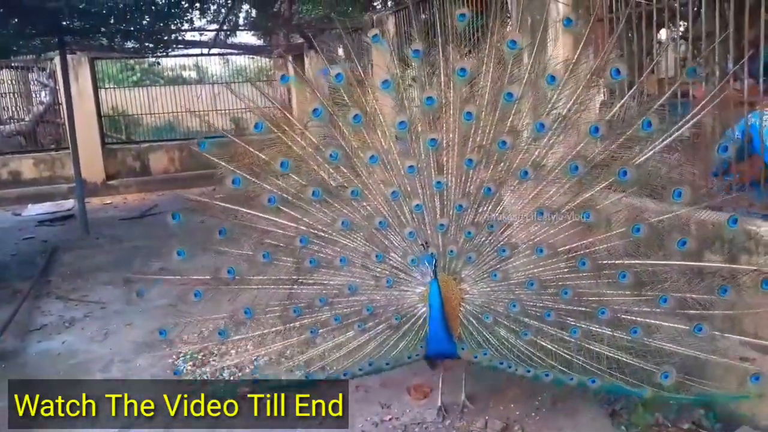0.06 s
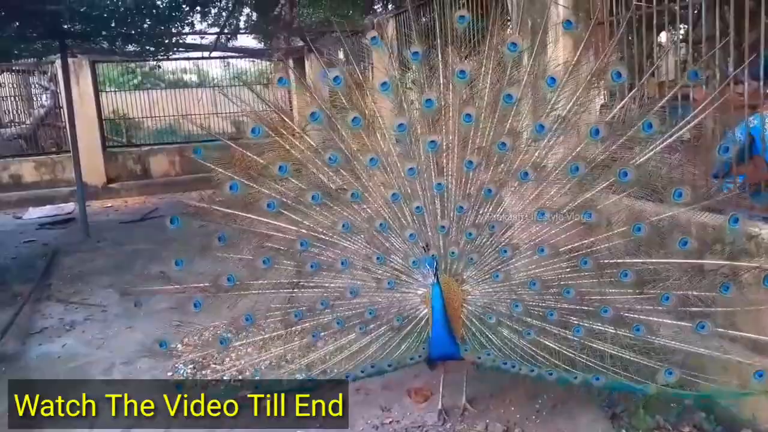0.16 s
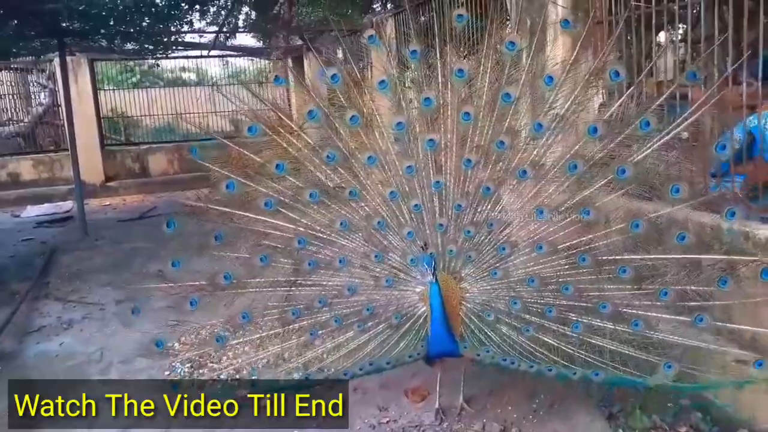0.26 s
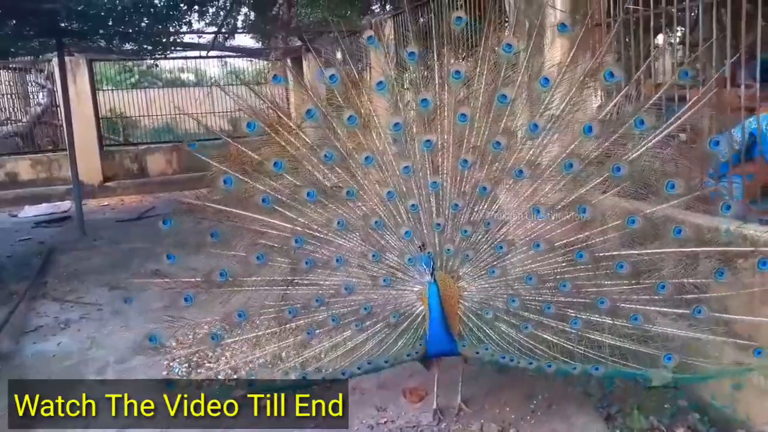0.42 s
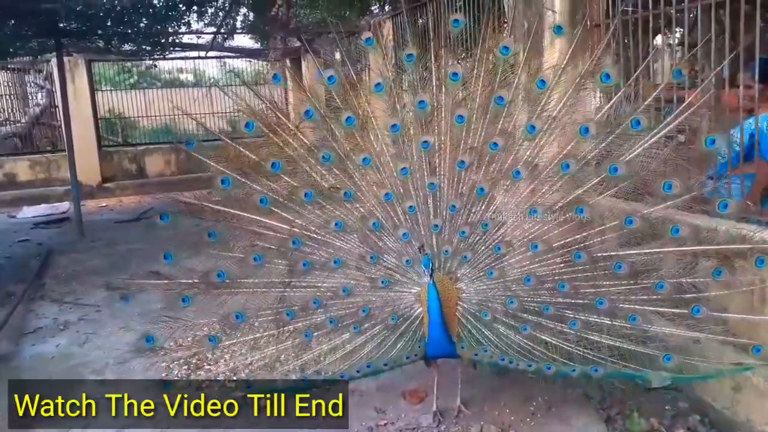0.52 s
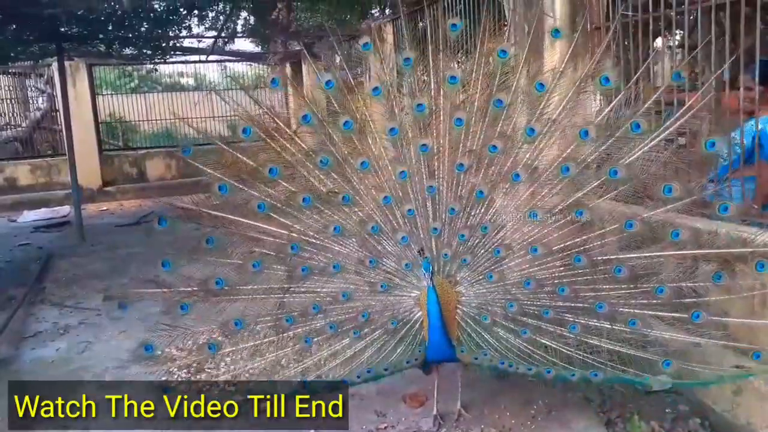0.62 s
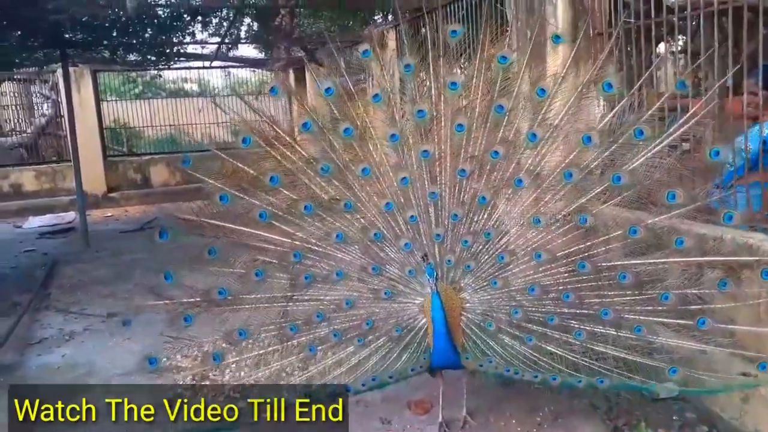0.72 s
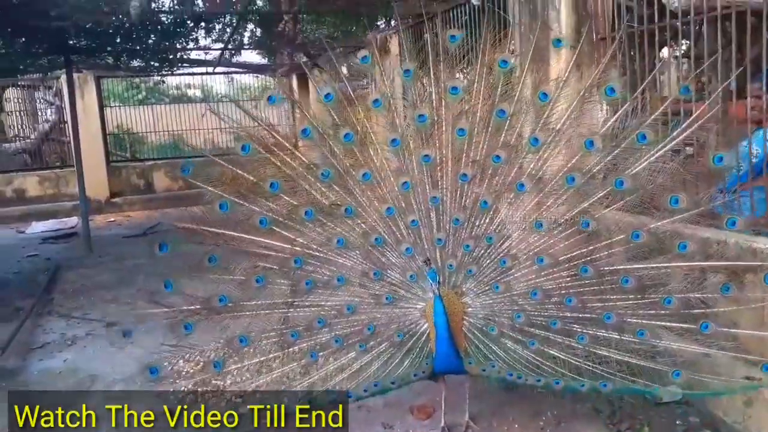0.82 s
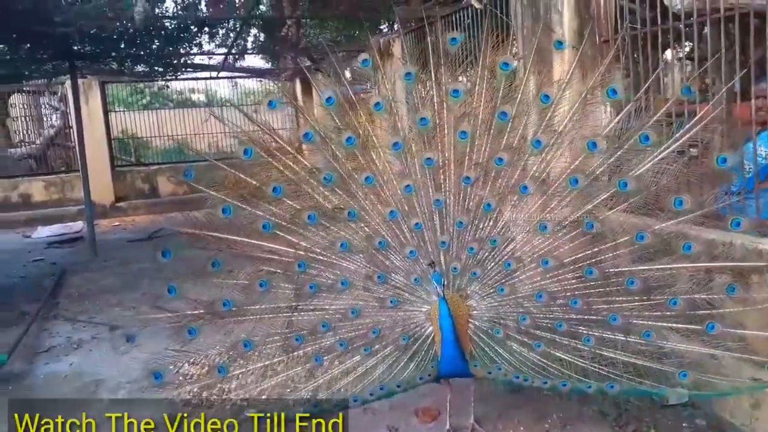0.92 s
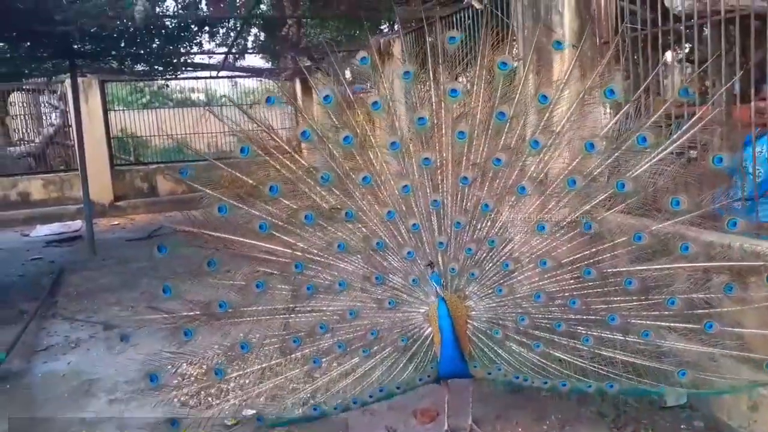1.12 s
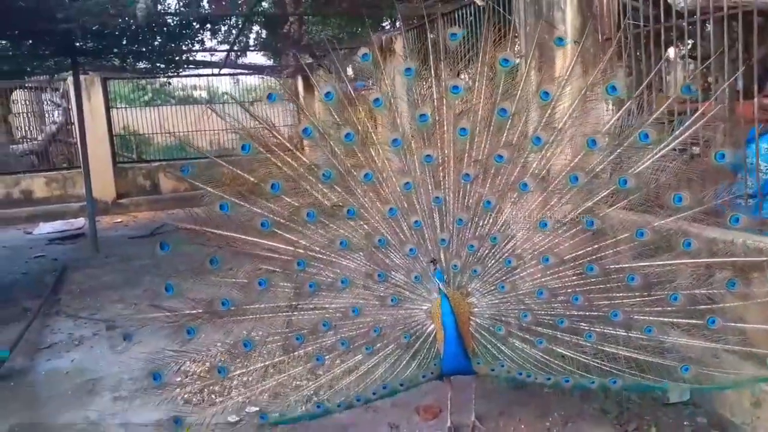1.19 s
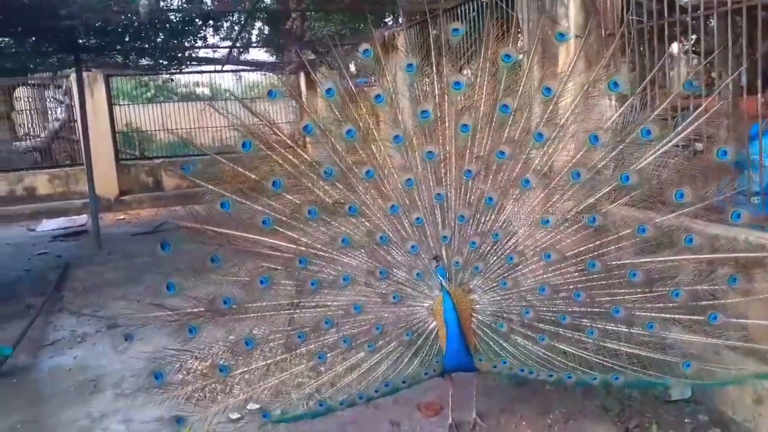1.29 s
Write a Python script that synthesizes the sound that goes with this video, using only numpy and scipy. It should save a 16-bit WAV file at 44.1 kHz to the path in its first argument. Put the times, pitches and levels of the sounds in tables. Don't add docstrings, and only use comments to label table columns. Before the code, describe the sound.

A single loud peacock scream starts almost at once, rises quickly, peaks, then sinks and stops. Short echoes from a walled yard follow, over faint engine throb and distant murmur, heard on an overloaded phone microphone.

```python
import sys
import numpy as np
from scipy import signal
from scipy.fft import rfft, irfft, next_fast_len
from scipy.io import wavfile
from scipy.ndimage import uniform_filter1d

SR = 44100
rng = np.random.default_rng(int(sys.argv[2]) if len(sys.argv) > 2 else 0)


def wav_out(sig):
    wavfile.write(sys.argv[1], SR, np.round(np.clip(np.atleast_2d(sig).T, -1, 1) * 32767).astype(np.int16))


def invert_db(level):
    return 10 ** (np.asarray(level, dtype=float) / 20)


N = 59535


def level(x, db):
    return x * invert_db(db) / np.sqrt(np.mean(x ** 2))


def ring(f, hz, width):
    return 1j * f * width / (hz ** 2 - f ** 2 + 1j * f * width)


def shape(x, response):
    n = next_fast_len(N + SR // 4)
    f = np.arange(n // 2 + 1) * SR / n
    return irfft(rfft(x, n) * response(f), n)[..., :N]


def walk(rate):
    hold = int(SR / rate)
    steps = np.repeat(rng.standard_normal(N // hold + 1), hold)
    slewed = uniform_filter1d(uniform_filter1d(steps, hold), hold)
    return 1.3 * slewed[:N]


def wavering_tone(hz, drift):
    return np.sin(2 * np.pi * np.cumsum(hz * (1 + drift * walk(30))) / SR)


def peacock(t):
    # t/s, pitch f/Hz, effort level/dB, brightness/(dB per octave), hiss level/dB
    call_arch = [
        (0.187, 542.5, -9, -6, 3.5),
        (.22, 577, -3.5, -3, 9.5),
        (0.279, 630.8, -3, -0.5, 7),
        (.36, 656.3, -4, 2.5, 3.5),
        (0.469, 668.5, 3, -2.5, 8),
        (0.602, 656.2, -3, 1.5, -7),
        (0.669, 628, -5, 0.5, -1.5),
        (.78, 549.2, -7, -2, -13.5),
        (.822, 479.8, -14.5, -3.5, -1.5),
    ]
    attack_s, release_s, call_db = 0.00297, 0.0067, -6.5
    wobble, jitter_rad, shimmer_db = 0.00022, 0.003, 0.61
    breath_db, hiss_db, hiss_hz, hiss_width_hz = -30, -18.5, 11300, 8000
    s, hz, effort_db, tilt, rasp_db = np.array(call_arch).T

    def smooth(values, size):
        return uniform_filter1d(np.interp(t, s, values), size)

    rasp = invert_db(smooth(rasp_db, size=400))
    pitch = smooth(hz, size=1800) * (1 + wobble * walk(60))
    phase = 2 * np.pi * np.cumsum(pitch) / SR + jitter_rad * rasp * walk(500)
    bright = smooth(tilt, size=400)
    voice = 0
    for k in range(1, 26):
        harmonic_db = bright * np.log2(k) + shimmer_db * walk(40)
        voice = voice + invert_db(harmonic_db) * np.cos(k * phase)

    air = rng.standard_normal((3, N)) * (1 + np.cos(phase)) * rasp
    opening = np.clip((t - s[0] + attack_s) / attack_s, 0, 1)
    closing = np.clip((s[-1] + release_s - t) / release_s, 0, 1)
    effort = invert_db(smooth(effort_db, size=400)) * opening * closing
    hiss = invert_db(hiss_db) * shape(air[1:] * effort, lambda f: ring(f, hiss_hz, hiss_width_hz) ** 2)
    piped = shape((voice + invert_db(breath_db) * air[0]) * effort, windpipe)
    return invert_db(call_db) * (piped + hiss), effort


def windpipe(f):
    # f/Hz, width/Hz, left level/dB, right level/dB
    pipe_modes = [(622.3, 65, -11, -6.5), (1208, 124, 2, 3), (1776, 110, -5.5, -36), (2004, 194, 5, 4.5),
                  (2455, 140, 1.5, -0.5), (3008, 86.7, 11, 2.5), (3369, 61, -14.5, 4),
                  (3799, 135, -8.5, -0.5), (4243, 72, -6, 1.5), (4710, 94, 2, -1), (5180, 97, -12, -46),
                  (6125, 160, -22.5, -18.5), (6785, 150, -14, -10), (7243, 140, -28, -13)]
    # first f/Hz, spacing/Hz, width/Hz, level/dB, slope/(dB per step)
    shrill_top = [
        (8470, 690, 244, -16.5, -0.3),
        (8580, 623, 350, -19.5, -0.34),
    ]
    # f/Hz, width/Hz, left share/1, right share/1
    wall_notches = [(647, 8.6, 0.45, 0.72), (1183, 120, 0.59, 0.0048), (1415, 46, .01, 1),
                    (1060, 46, 0.0056, 1), (1818, 78, 1, 0.12), (2337, 48, 1, 0.91), (2585, 71, 0.074, 1),
                    (3110, 120, 1, 0), (3273, 24, 1, 1), (6044, 74, 0.28, .7)]
    port_lag_s = 0.00002
    ports = []
    for port in range(2):
        h = sum(invert_db(mode[2 + port]) * ring(f, mode[0], mode[1]) for mode in pipe_modes)
        first, spacing, width, db, slope = shrill_top[port]
        for k in range(-1, 11):
            h = h + invert_db(db + slope * k) * ring(f, first + spacing * k, width)
        h = h * np.exp(-2j * np.pi * f * port * port_lag_s)
        for notch in wall_notches:
            h = h * (1 - min(notch[2 + port], 1) * ring(f, notch[0], notch[1]))
        ports.append(h)
    return np.array(ports)


def yard(x, t):
    mesh_hz, pen_top_hz, far_wall_hz = 8000, 4500, 2554
    mesh = echoes(x, t, db=0, t60=0.058, gap=0.001,
                  colour=lambda f: (1j * f / mesh_hz / (1 + 1j * f / mesh_hz)) ** 2)
    pen = echoes(x, t, db=-11.5, t60=0.29, gap=0.017, colour=lambda f: 1 / (1 + 1j * f / pen_top_hz))
    far_wall = echoes(x, t, db=-22.5, t60=0.74, gap=0.059,
                      colour=lambda f: ring(f, far_wall_hz, far_wall_hz))
    return mesh + pen + far_wall


def echoes(x, t, db, t60, gap, colour):
    fade = np.clip(t / gap, 0, 1) ** 2 * invert_db(-60 * t / t60)
    tail = shape(rng.standard_normal((2, N)) * fade, colour)
    gain = np.abs(colour(np.arange(20, SR / 2, 20))) ** 2
    energy = np.sum(tail ** 2, axis=1, keepdims=True)
    tail = tail * np.sqrt(gain.mean() / gain.max() / energy)
    return invert_db(db) * signal.fftconvolve(x, tail, axes=1)[:, :N]


def call_rumble(effort):
    rumble_hz = 80
    rumble = shape(rng.standard_normal((2, N)), lambda f: 1 / (1 + 1j * f / rumble_hz))
    return level(rumble, -42) * effort ** 2


def tick(t):
    start_s, hz, db, t60_s = 0.143, 3650, -45.5, 0.04
    after = np.maximum(t - start_s, 0)
    snap = np.sin(2 * np.pi * hz * after) + 0.72 * np.diff(rng.standard_normal(N + 1))
    return np.sign(after) * invert_db(db - 60 * after / t60_s) * snap


def engine(t):
    hz, width_hz, throb_hz, throb_s = 82, 20, 9.9, 0.985
    turn = 2 * np.pi * throb_hz * (t - throb_s)
    throb = invert_db(3.4 * np.cos(turn) + 4.6 * np.cos(2 * turn) + 1.5 * walk(11))
    drone = wavering_tone(hz, 0.07) * throb
    return level(shape(drone, lambda f: ring(f, hz, 2 * width_hz)), -48)


def far_call(t):
    start_s, hz, db = 1.3, 968, -54
    return invert_db(db) * wavering_tone(hz, 0.00306) * np.clip((t - start_s) / 0.017, 0, 1)


def cricket_and_whine():
    cricket = level(wavering_tone(3912, 0.003) * invert_db(3 * walk(40)), -60.5)
    whine = level(wavering_tone(1997, 0.003) * invert_db(4 * walk(25)), -66.5)
    return (cricket + whine) * invert_db(np.array([[1.5], [-1.5]]))


def town():
    # f/Hz, level/(dB per Hz)
    murmur = np.array([(25, -4), (70, -14), (150, -4.5), (500, -14.5), (3000, -22.5), (5000, -29.5),
                       (10000, -34.5), (14000, -47.5)])
    out, swell = 0, walk(1.3)
    for hz in 28 * 2 ** np.arange(0, 9.1, 0.5):
        mid, side = shape(rng.standard_normal((2, N)), lambda f: ring(f, hz, hz / 3) ** 2)
        db = np.interp(np.log(hz), np.log(murmur[:, 0]), murmur[:, 1])
        db = db + 1.0 * swell + 1.5 * walk(3.5)
        spread = min(0.17 + hz / 1300.0, 1)
        out = out + invert_db(db) * (mid + spread * side * np.array([[1], [-1]]))
    return level(out, -48.5)


def scene():
    t = np.arange(N) / SR
    bird, effort = peacock(t)
    distant = engine(t) + tick(t) + far_call(t) + cricket_and_whine()
    return bird + yard(bird, t) + call_rumble(effort) + distant + town()


def band_limit(x):
    return signal.sosfilt(signal.butter(12, 15560, fs=SR, output="sos"), x)


def record(dry):
    return band_limit(np.clip(dry, -1, 1))


dry = scene()
out = record(dry)
wav_out(out)
```